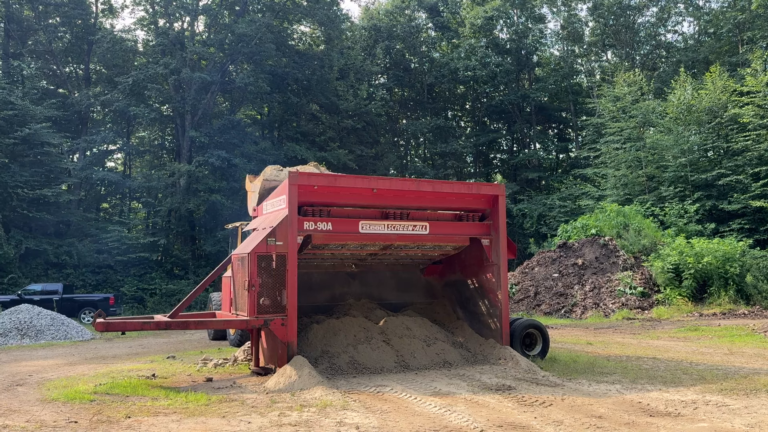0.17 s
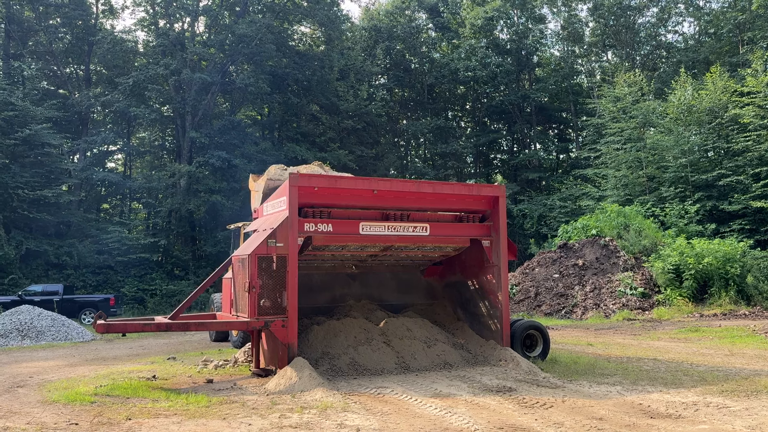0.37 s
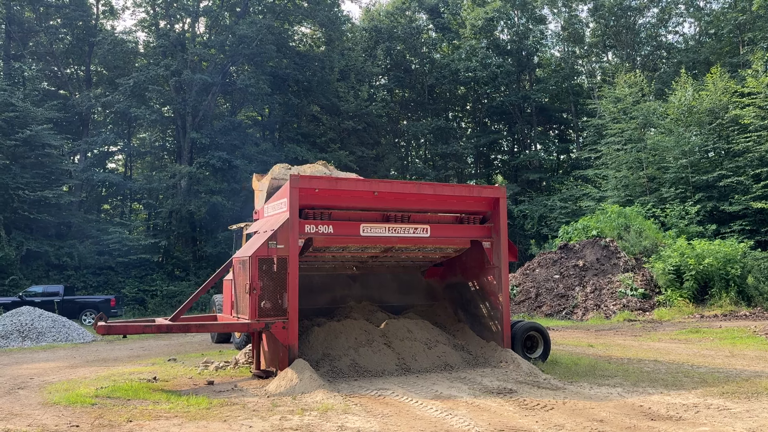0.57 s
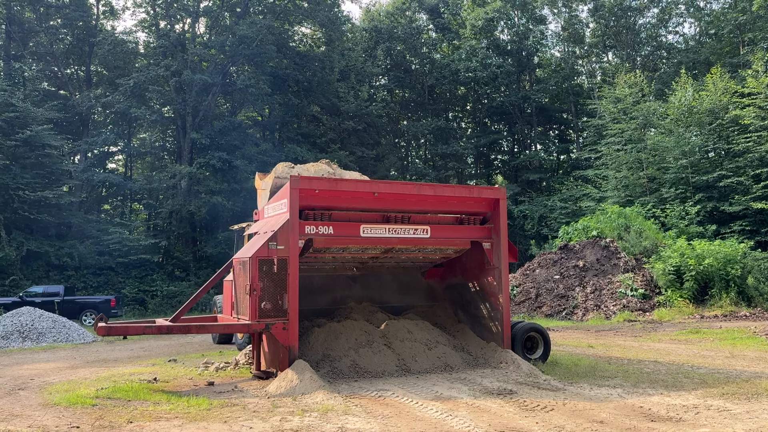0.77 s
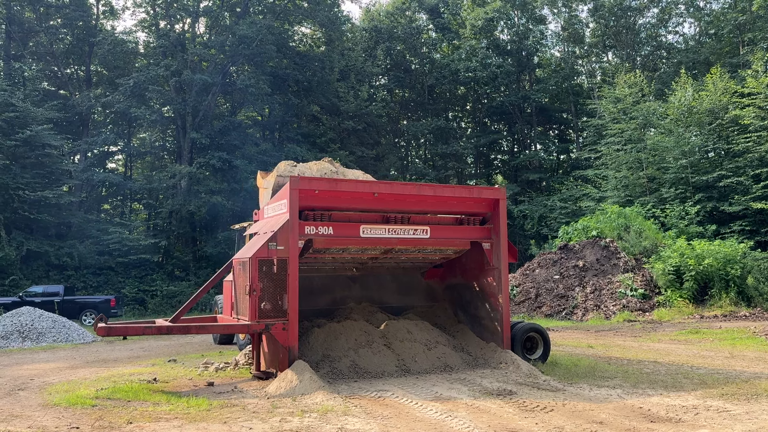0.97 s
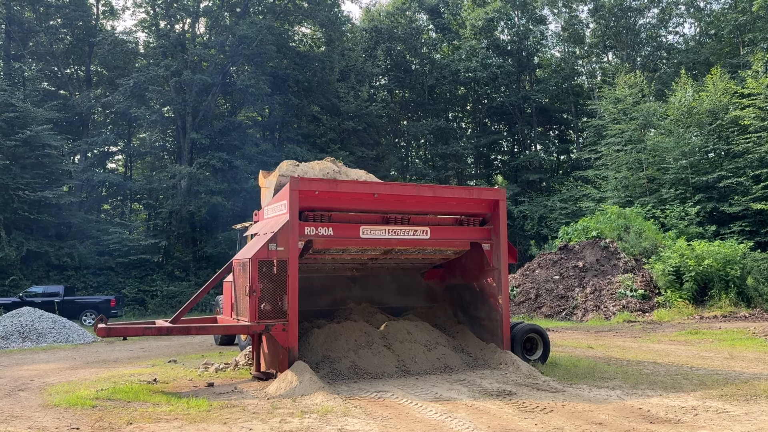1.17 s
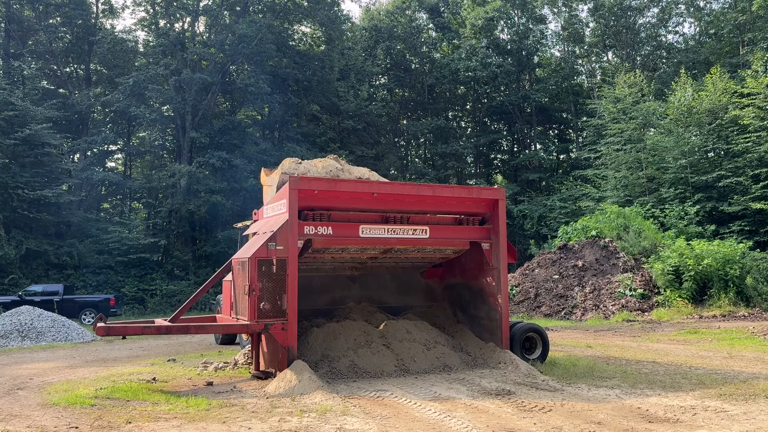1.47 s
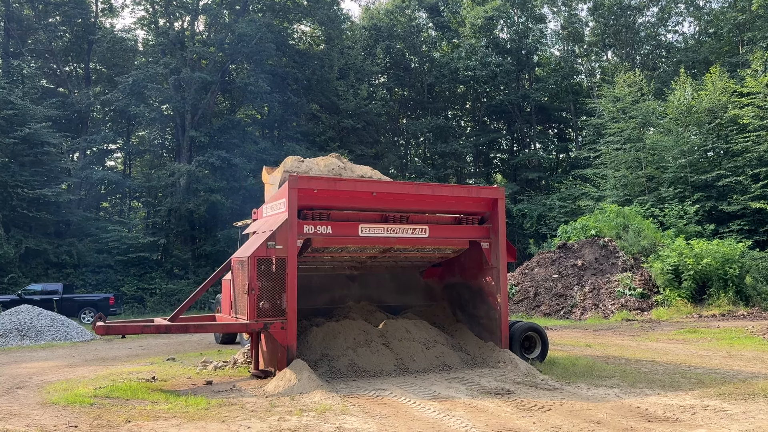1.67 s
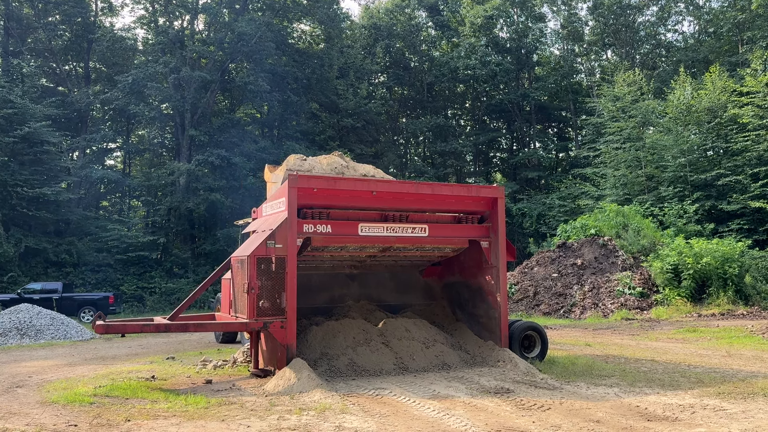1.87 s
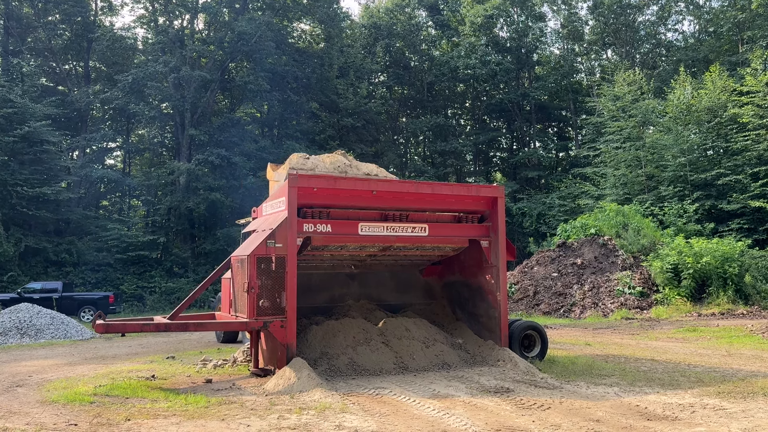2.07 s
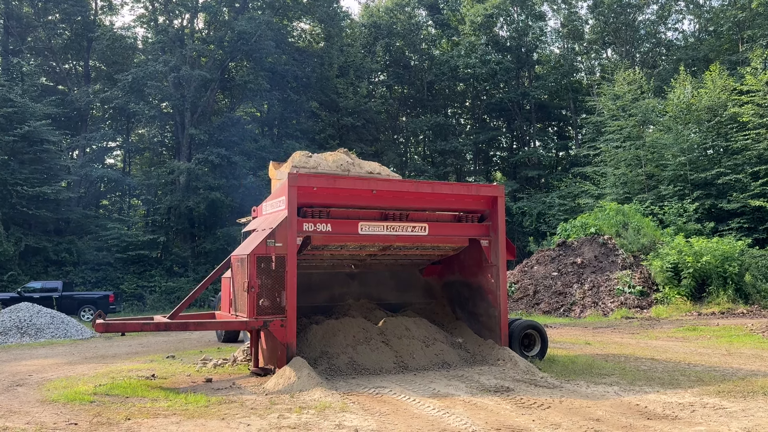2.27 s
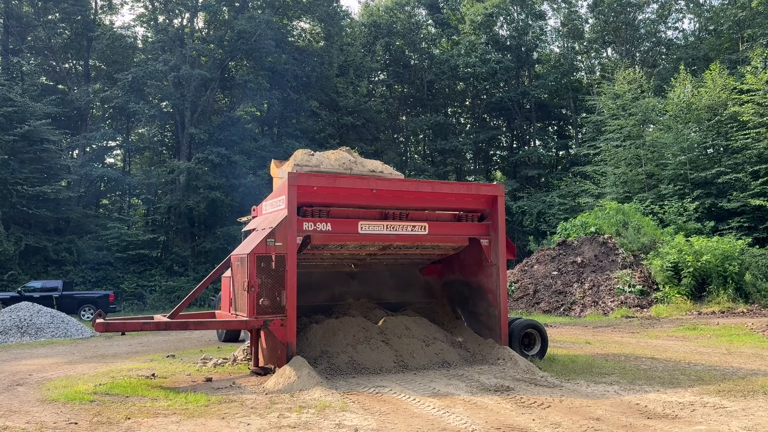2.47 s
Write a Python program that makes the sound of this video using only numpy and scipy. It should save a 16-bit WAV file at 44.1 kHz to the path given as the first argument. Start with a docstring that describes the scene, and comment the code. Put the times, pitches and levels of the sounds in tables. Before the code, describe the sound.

Steady loud rattle of a vibrating soil screen, with droning diesel engine, hissing grit and knocking stones.

```python
"""An open dirt lot: a three-cylinder diesel drives a vibrating screen while a second diesel idles further off.
Each engine is a harmonic series on its four-stroke cycle; the steel frame sounds on multiples of the throw.
The deck throws sand and stones about nineteen times a second: dense clicks and noise rattle and hiss.
Big stones ring the deck's resonances and grit ticks brightly; two close microphone ports hear it metres away."""
import sys
import numpy as np
from scipy import signal
from scipy.fft import rfft, irfft
from scipy.io import wavfile

SR = 44100
rng = np.random.default_rng(int(sys.argv[2]) if len(sys.argv) > 2 else 0)


def digitize_waveform(pressure):
    """Quantize a signal to 16-bit integers and store it at the path in sys.argv[1].

    Rows of a 2-D input are taken as channels; values are limited to [-1, 1].
    """
    field = np.atleast_2d(pressure).T
    bounded = np.clip(field, -1, 1)
    quanta = np.round(bounded * 32767).astype(np.int16)
    wavfile.write(sys.argv[1], SR, quanta)


def boost_factor(decibels):
    """Convert a level in decibels to a linear amplitude factor."""
    exponent = np.asarray(decibels, float) / 20
    return 10 ** exponent


N = 115101

CYCLE_HZ = 15.900  # driving engine's four-stroke cycles a second
THROW_HZ, LANDING_S = 18.619, .035  # screen shaft turns a second; a time at which the load lands
RUMBLE_TOP_HZ, SPLIT_HZ = 220, 7500  # deck rattle lies between these, grit hiss above


def at_hz(rows, hz, axis=1):
    """Spectral interpolation: a table column joined on a log-frequency axis."""
    rows = np.array(rows, float)
    return np.interp(np.log(hz + 1), np.log(rows[:, 0]), rows[:, axis])


def rms_one(x):
    """Normalization: a signal divided by its root mean square."""
    return x / np.sqrt(np.mean(x ** 2) + 1e-20)


def drift(rate_hz):
    """Low-passed random fluctuation: noise through a double pole, of spread 1."""
    hop = 40  # samples between drawn values
    r = np.exp(-2 * np.pi * rate_hz * hop / SR)
    noise = rng.standard_normal(N // hop + 2002)
    slow = signal.lfilter([1], [1, -2 * r, r * r], noise)[2000:]
    return np.interp(np.arange(N) / hop, np.arange(len(slow)), rms_one(slow - slow.mean()))


def swell(x, rise_s, fall_s):
    """Exponential attack and decay: two cascaded one-pole filters shape each click."""
    a, b = np.exp(-1 / (rise_s * SR)), np.exp(-1 / (fall_s * SR))
    falling = signal.lfilter([1], [1, -b], x)
    return 2 * signal.lfilter([1 - a], [1, -a], falling)


def clicks(rows):
    """Impulse excitation: one sample for each row of (time [s], level [dB])."""
    out = np.full(N, 1e-18)
    for s, db in rows:
        out[int(s * SR)] = boost_factor(db)
    return out


def tones(orders, base_hz, first_s, spread, waver_s, waver_db, lag=0, flip=999):
    """Fourier synthesis: sines on multiples of a turning rate, with phase set by order [rad]."""
    turn = 2 * np.pi * base_hz * (np.arange(N) / SR - first_s + waver_s * drift(1.43))
    top = max(orders, key=lambda row: row[1])[0]  # the strongest order has no lag
    out = 0
    for k, db in orders:
        level_db = db + waver_db * min(k / 12, 1) * drift(6.6)  # low orders waver less
        phase = spread * (k - top) ** 2 + lag * (k - top) + np.pi * (k > flip)
        out = out + np.sqrt(2) * boost_factor(level_db) * np.cos(k * turn - phase)
    return out


def engine():
    """Harmonics of the firing cycle lag in the pipe; phase inverts above the pipe's resonance."""
    # engine tones before wavering: (multiple of the cycle, level [dB rms])
    engine_orders = [(3, -30.5), (4, -46.4), (5, -43), (6, -41.1), (7, -36.2), (8, -36.2), (9, -36.2),
                     (10, -47), (11, -48), (12, -42), (13, -47), (14, -54), (16, -50), (17, -48), (18, -43),
                     (20, -45), (22, -46), (24, -51)]
    return tones(engine_orders, CYCLE_HZ, first_s=0.00784, spread=0, waver_s=.00008, waver_db=.8,
                 lag=1.95, flip=8.5)


def idler():
    """Periodic combustion: the distant diesel is a harmonic series on its own slower cycle."""
    # idling engine tones before wavering: (multiple of its cycle, level [dB rms])
    idler_orders = [(3, -68), (4, -40.3), (8, -44), (9, -54)]
    return tones(idler_orders, 9.408, first_s=0.0236, spread=0.11, waver_s=.0003, waver_db=0.56)


def screen_frame():
    """Forced vibration: the frame sounds on multiples of the shaft's throw."""
    # screen frame tones before wavering: (multiple of the throw, level [dB rms])
    frame_orders = [(3, -53), (4, -77), (5, -42), (8, -36.5), (9, -44.5), (11, -48), (15, -48)]
    return tones(frame_orders, THROW_HZ, first_s=0.00969, spread=0.412, waver_s=.0002, waver_db=3.2)


def whine():
    """Order-locked vibration: gears and block whine on high multiples of the cycle, wavering."""
    # gear and block tones before wavering: (multiple of the cycle, level [dB rms])
    whine_orders = [(34, -49.5), (40, -43.5), (47, -39.5), (51, -43.5), (69, -51), (71, -53), (72, -37),
                    (75, -47), (78, -47), (136.5, -45.5)]
    return tones(whine_orders, CYCLE_HZ, first_s=0, spread=1, waver_s=.00015, waver_db=2)


def hums():
    """Pure tones: two faint hums keep their pitch while their level wavers."""
    # hums before wavering: (multiple of 0.87 Hz, level [dB rms])
    hum_orders = [(82.3, -48), (87.8, -47.5)]
    return tones(hum_orders, 0.87, first_s=0, spread=0, waver_s=0, waver_db=1)


def rumble():
    """Broadband radiation: two draws of coloured noise from engine and frame between the low tones."""
    # rumble colour: (frequency [Hz], relative density [dB per Hz])
    rumble_colour = [(20, -40), (45, -25), (65, -11), (85, -1), (105, -5), (135, -5), (170, 3), (200, 2),
                     (220, -4)]
    hz = np.fft.rfftfreq(N, 1 / SR)
    inside = (hz > 15) & (hz <= RUMBLE_TOP_HZ)
    spectrum = rfft(rng.standard_normal((2, N))) * boost_factor(at_hz(rumble_colour, hz)) * inside
    return boost_factor(-38) * rms_one(irfft(spectrum, N))


def rattle(colour, low_hz, high_hz, beat_db, step):
    """Shot noise: two draws of stone clicks and sand noise, in bands modulated by the beat; rms 1."""
    stones_per_s, spread_db, stone_share = 2500, 3.0, 0.28  # stone_share is of the power
    sizes = boost_factor(spread_db * np.minimum(rng.exponential(1, (2, N)), 5)) * rng.choice([-1, 1], (2, N))
    stones = rms_one(sizes * (rng.random((2, N)) < stones_per_s * boost_factor(beat_db) / SR))
    sand = rng.standard_normal((2, N))
    raw = np.sqrt(stone_share) * stones + np.sqrt(1 - stone_share) * sand
    hz = np.fft.rfftfreq(N, 1 / SR)
    # uneven plate resonances: a random ripple of 1 dB, 39.2 Hz wide
    knots = np.arange(0, SR / 2 + 100, 39.2)
    ripple_db = np.interp(hz, knots, rng.standard_normal(len(knots)))
    inside = (hz > low_hz) & (hz <= high_hz)
    spectrum = rfft(raw) * boost_factor(at_hz(colour, hz) + ripple_db) * inside
    out = 0
    # overlapping bands, step octaves apart, each with its own 1 dB flicker
    for centre in np.arange(np.log2(low_hz), np.log2(high_hz) + step, step):
        window = np.clip(1 - np.abs(np.log2(hz + 1) - centre) / step, 0, 1)
        follows = 1 / (1 + (650 / 2 ** centre) ** 2)  # bands well below 650 Hz hardly throb
        out = out + irfft(spectrum * window, N) * boost_factor(follows * (beat_db + drift(29.0)))
    return rms_one(out)


def lumps():
    """Repeated impact: one landing a throw, early or late, light or heavy; spread 1."""
    early_s, scatter_s = 0.0073, .006
    chance = rng.standard_normal((60, 2))
    s = LANDING_S - early_s + np.arange(60) / THROW_HZ + scatter_s * chance[:, 0]
    out = np.zeros(N + 2 * SR)
    out[(np.abs(s) * SR).astype(int)] = 1 + 0.52 * np.tanh(chance[:, 1])
    out = swell(out[:N], 0.0044, .015)
    return rms_one(out - out.mean())


def deck_rattle(chance_db):
    """Impact noise on steel: stones rattle once a throw, coloured by the deck."""
    # rattling deck's colour: (frequency [Hz], relative density [dB per Hz])
    deck_colour = [(220, -6), (240, -5.5), (300, -4), (370, -5.5), (460, 0), (560, -2.5), (680, -1),
                   (760, 3), (820, 1.5), (900, -3), (1000, -2), (1150, 2.5), (1280, 1), (1500, -1.5),
                   (1620, -3), (1800, -4.5), (1930, -1), (2100, -8), (2450, -8.5), (2650, -13),
                   (3100, -14.5), (3400, -11.5), (4000, -14), (4550, -12), (5000, -18.5), (5500, -19),
                   (5800, -19.5), (6400, -20), (7200, -23), (7500, -17)]
    t = np.arange(N) / SR
    throw_db = 0.56 * np.cos(2 * np.pi * THROW_HZ * (t - LANDING_S)) + .8 * lumps()
    return rattle(deck_colour, RUMBLE_TOP_HZ, SPLIT_HZ, chance_db + throw_db, step=0.482)


def grit_hiss(chance_db):
    """Granular friction noise: sand and grit hiss in the treble, modulated at one and two times the throw."""
    # sand and grit colour: (frequency [Hz], relative density [dB per Hz])
    grit_colour = [(7500, 2), (8300, 0.5), (9000, 0.5), (10500, 0.5), (12000, 0), (13200, -4), (13800, 3),
                   (14200, -6.5), (15200, -7), (15650, 4), (15800, -6)]
    turn = 2 * np.pi * THROW_HZ * (np.arange(N) / SR - 0.028)
    throw_db = 1.2 * np.cos(turn) - 0.75 * np.cos(2 * turn)
    return rattle(grit_colour, SPLIT_HZ, 15850, chance_db + throw_db, step=0.42)


def screen():
    """Amplitude modulation: load, surges and heaps move rattle and hiss together; two unrelated draws."""
    # load on the deck, as a reference for its noise: (time [s], level [dB])
    load_rows = [(0.06, -29.5), (0.45, -29.5), (0.89, -29.5), (2.6, -30)]
    load_db = np.interp(np.arange(N) / SR, *np.transpose(load_rows))
    heaps_per_s = 90
    heaps = (rng.random(N) < heaps_per_s / SR) * rng.random(N)
    heaps = swell(heaps, rise_s=0.0026, fall_s=.012)
    surges_db = 0.28 * drift(9.8)
    chance_db = load_db - load_db.mean() + surges_db + 0.91 * rms_one(heaps - heaps.mean())
    cap_db = 2.8  # chance swells level off here
    chance_db = cap_db * np.tanh(chance_db / cap_db)
    deck = boost_factor(7) * deck_rattle(chance_db)
    grit = boost_factor(-8.5) * grit_hiss(chance_db)
    return boost_factor(load_db.mean()) * (deck + grit)


def knocks():
    """Modal synthesis: big stones land in a short noisy clatter that rings the deck's resonances."""
    # big stones landing: (time [s], relative level [dB])
    knock_rows = [(0.182, -21), (0.242, -15), (0.294, -27), (0.352, -10), (0.493, -19), (0.621, -16),
                  (0.831, -7), (0.931, -9.5), (1.049, -7), (1.162, -11), (1.314, -16), (1.524, -18),
                  (1.58, -12), (1.856, -8), (2.067, -11), (2.127, -9), (2.235, -18), (2.305, -14),
                  (2.449, -5.5), (2.561, -12.5)]
    # steel deck resonances: (frequency [Hz], relative level [dB])
    deck_modes = [(680, -11.5), (810, -5.5), (950, -7), (1130, -14), (1300, -23), (1480, -8), (1900, -7),
                  (2400, -13.5), (3500, -16.5), (4400, -18.5)]
    t60_s, gain_db = 0.019, -30
    clatter = swell(clicks(knock_rows), rise_s=0.0042, fall_s=0.0091)
    r = boost_factor(-60 / (t60_s * SR))  # pole radius: 60 dB of decay in t60_s
    out = 0
    for hz, db in deck_modes:
        w = 2 * np.pi * hz / SR
        push = boost_factor(db + gain_db) * clatter * rng.standard_normal(N)
        out = out + signal.lfilter([0, np.sin(w)], [1, -2 * r * np.cos(w), r * r], push)
    return out


def ticks():
    """Noise bursts: grit ticks are short envelopes on high-passed noise."""
    # bright grit ticks: (time [s], relative level [dB])
    tick_rows = [(1.333, -19), (1.4994, -36), (1.7194, -33), (1.9739, -25), (2.393, -24)]
    shape = swell(clicks(tick_rows), rise_s=0.0069, fall_s=0.0036)
    high_pass = signal.butter(4, 8500, "high", fs=SR, output="sos")
    return signal.sosfilt(high_pass, shape * rng.standard_normal(N))


def ports(firm, direct, scattered):
    """Interchannel coherence: phase lead and level tilt place the sound; scattered sound differs by port."""
    # ports: (frequency [Hz], share alike [0-1], right port's lead [rad], left minus right [dB])
    port_rows = [(30, 0.83, 0.063, 0.5), (300, 0.95, -0.047, -0.8), (1000, 0.95, 0.18, -1.1),
                 (1650, 0.77, -0.31, -1.7), (2380, 0.86, -0.35, -0.5), (2900, 0.2, 0.0099, -3),
                 (3200, 0.2, -1.8, 2.5), (3460, 1, -0.93, 1), (4560, 0.97, -0.89, 0),
                 (5800, 0.93, -1.3, -2), (6200, 0.9, -0.52, -2), (7300, 0.64, 1, 3), (7650, 0.3, 0, 0)]
    treble_alike, treble_lead_s, in_step_hz = .96, .0003175, 7980  # in step: no phase lead at this pitch
    hz = np.fft.rfftfreq(N, 1 / SR)
    treble = hz > SPLIT_HZ
    alike = np.where(treble, treble_alike, at_hz(port_rows, hz, axis=1))
    treble_lead = 2 * np.pi * (hz - in_step_hz) * treble_lead_s
    lead = np.where(treble, treble_lead, at_hz(port_rows, hz, axis=2))
    tilt = at_hz(port_rows, hz, axis=3)
    same = np.sqrt((1 + alike) / 2) * rfft(direct) + rfft(firm)
    other = np.sqrt((1 - alike) / 2) * rfft(scattered)
    left = (same + other) * boost_factor(tilt / 2) * np.exp(-.5j * lead)
    right = (same - other) * boost_factor(-tilt / 2) * np.exp(.5j * lead)
    return np.array([irfft(left, N), irfft(right, N)])


def scene():
    """Superposition: engines, screen, knocks and ticks add up and reach both ports."""
    machines = engine() + idler() + screen_frame() + whine() + hums()
    direct, scattered = rumble() + screen()
    return ports(machines + knocks() + ticks(), direct, scattered)


def top_cut(x):
    """Nothing passes above the cut-off."""
    return signal.sosfilt(signal.butter(12, 15810, fs=SR, output="sos"), x)


def record(dry):
    """Time gating: the sound starts after a short silence."""
    start_s = .0362
    mix = dry * (np.arange(N) > start_s * SR)
    return top_cut(mix)


dry = scene()
out = record(dry)
digitize_waveform(out)
```